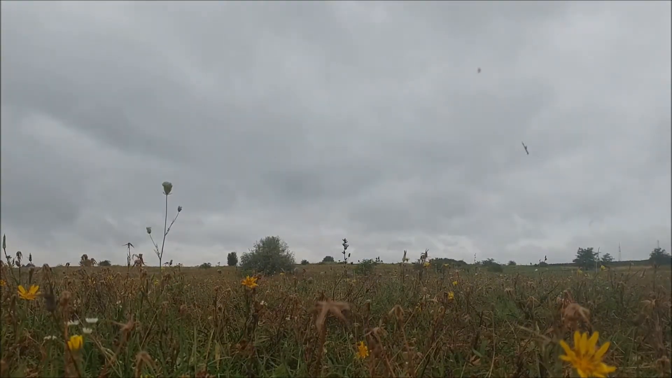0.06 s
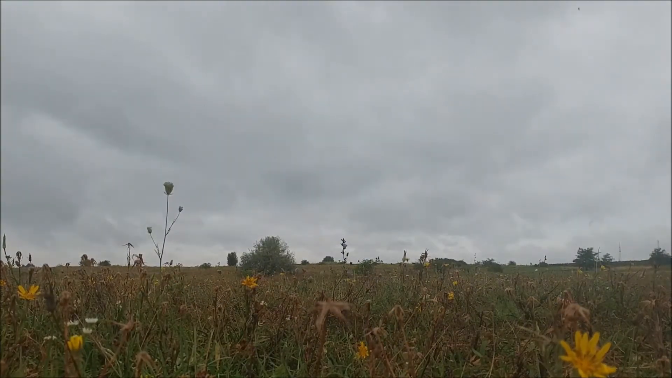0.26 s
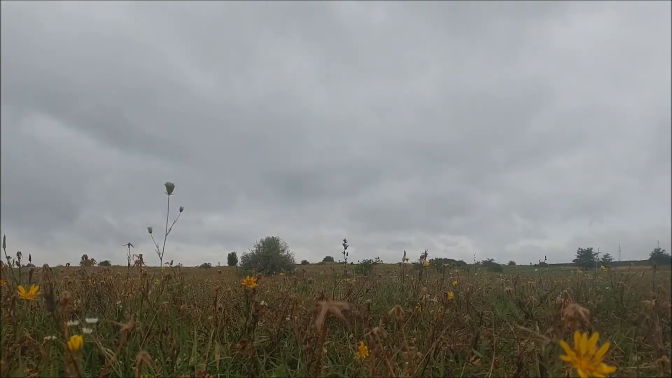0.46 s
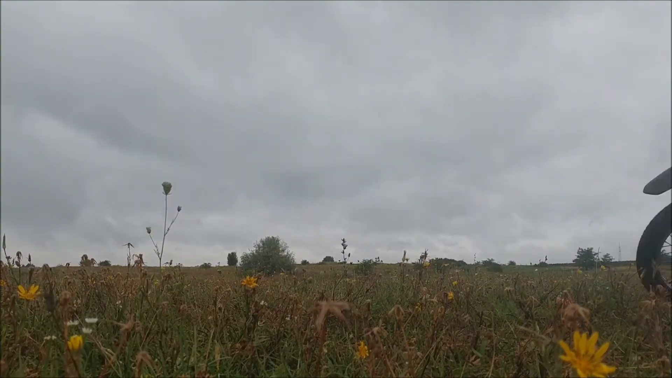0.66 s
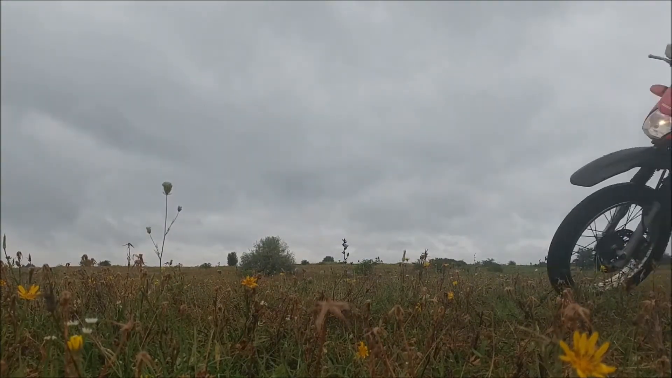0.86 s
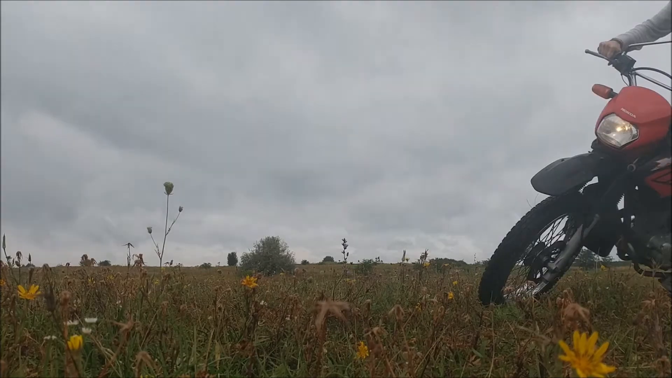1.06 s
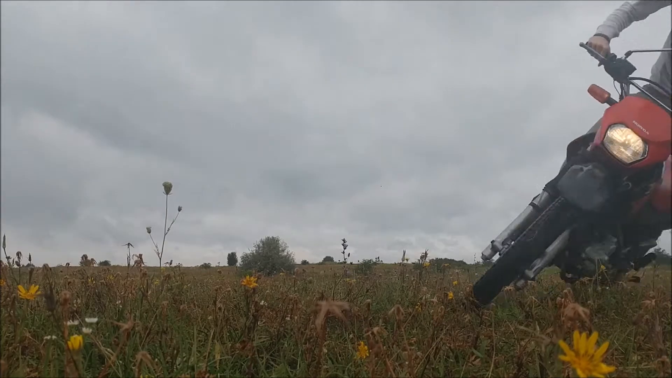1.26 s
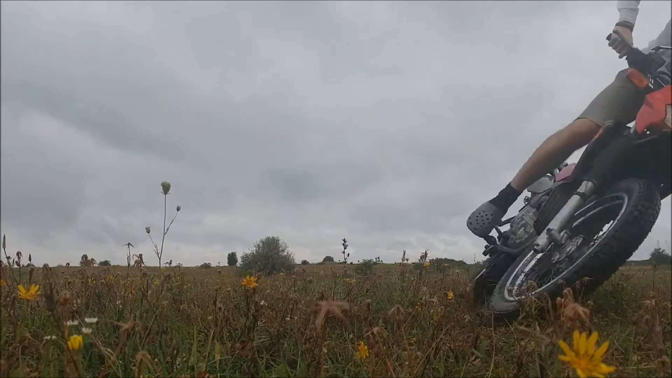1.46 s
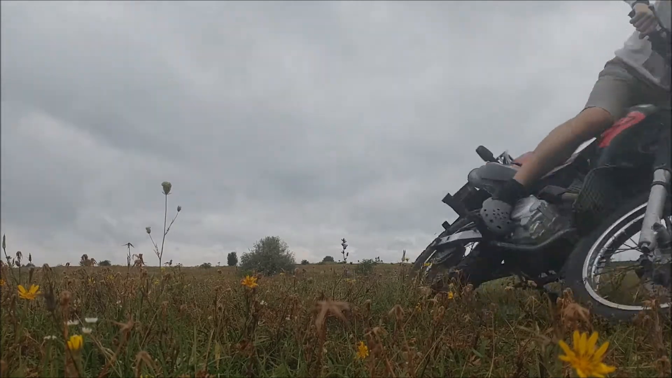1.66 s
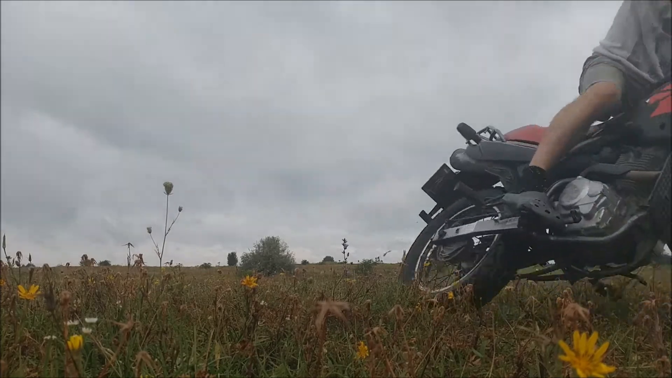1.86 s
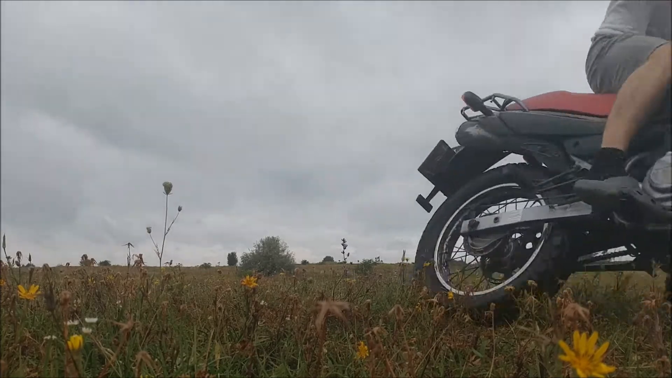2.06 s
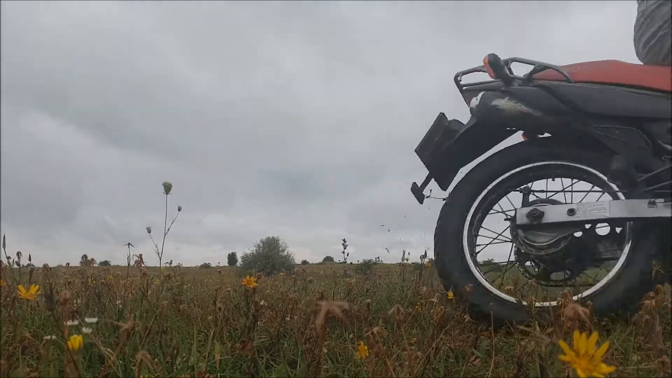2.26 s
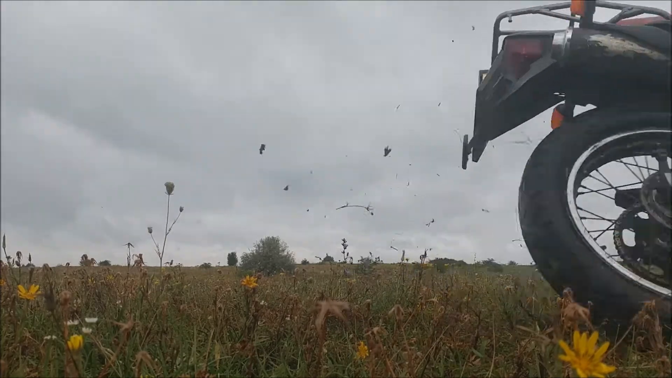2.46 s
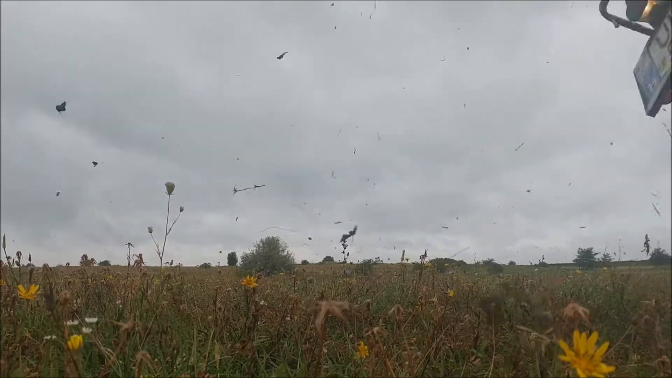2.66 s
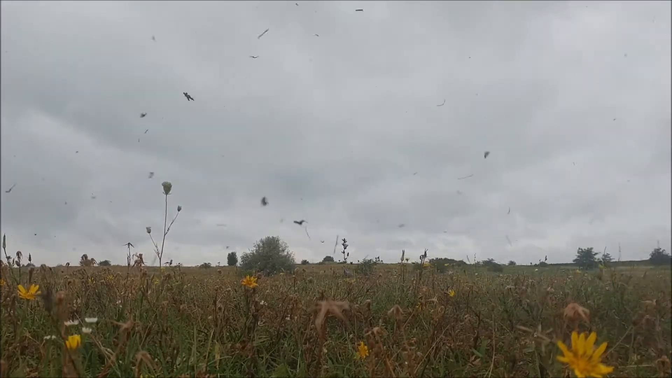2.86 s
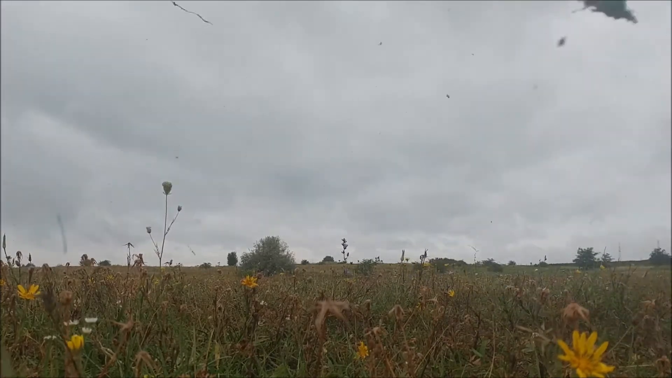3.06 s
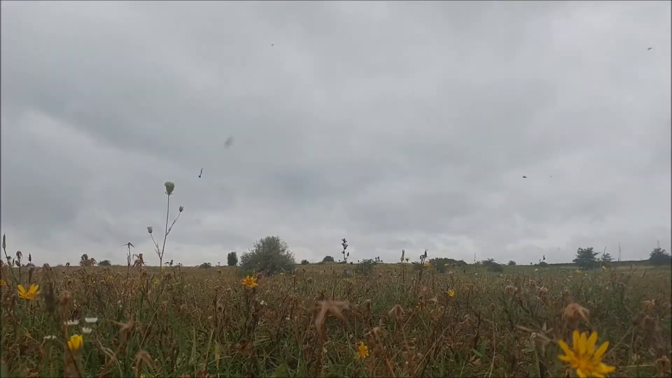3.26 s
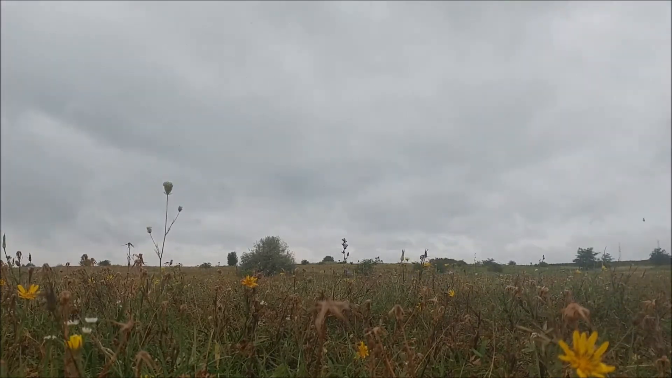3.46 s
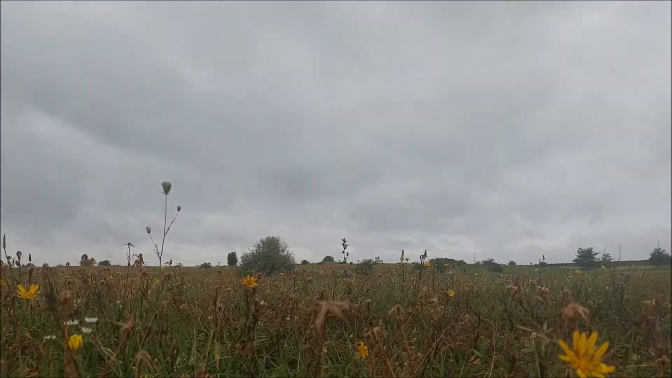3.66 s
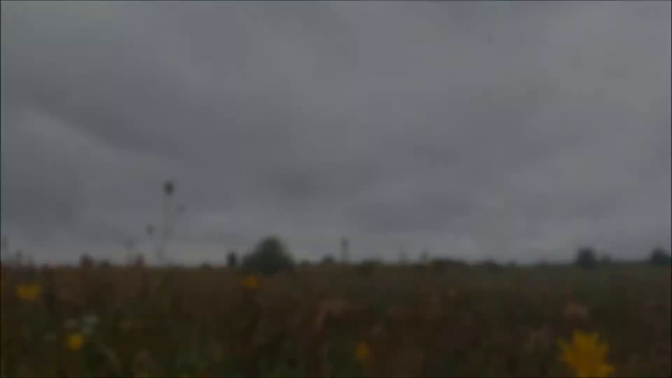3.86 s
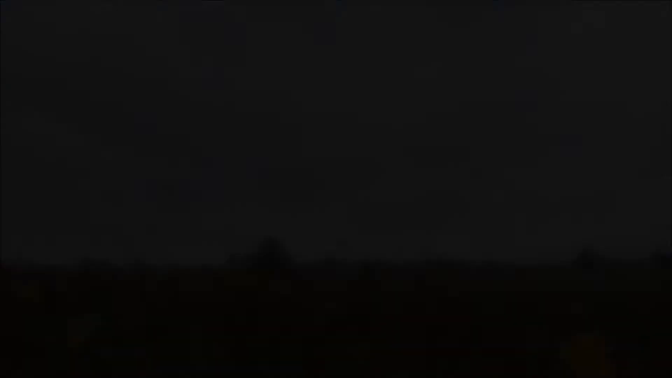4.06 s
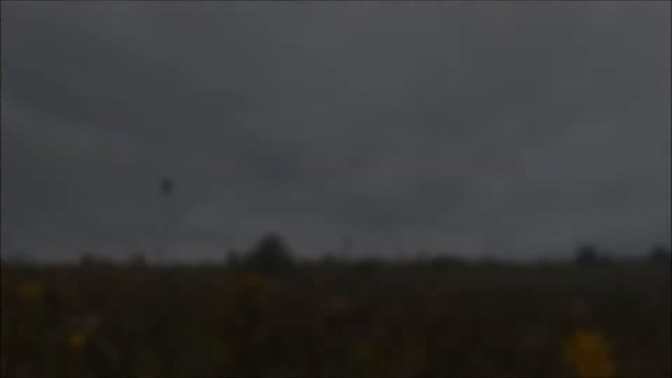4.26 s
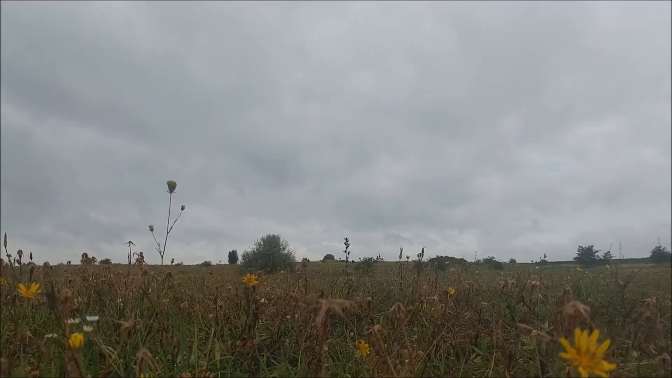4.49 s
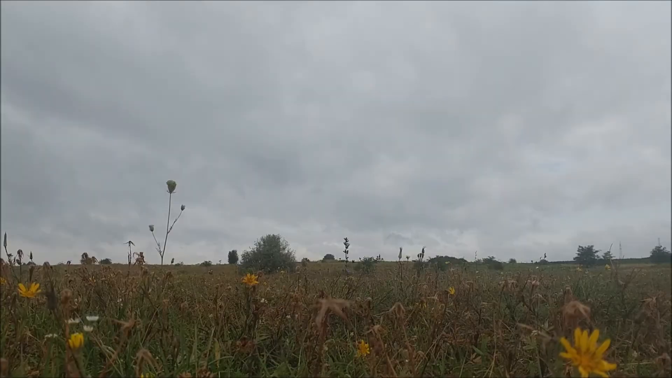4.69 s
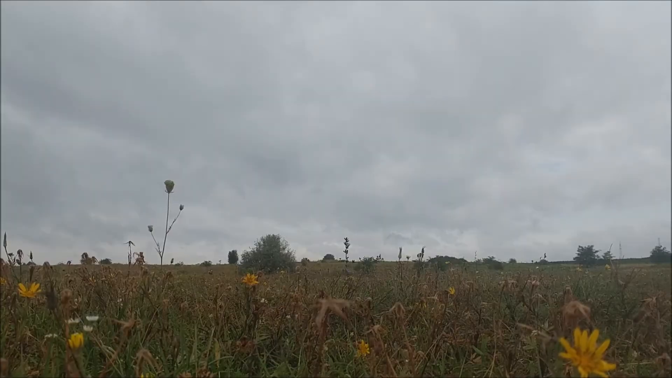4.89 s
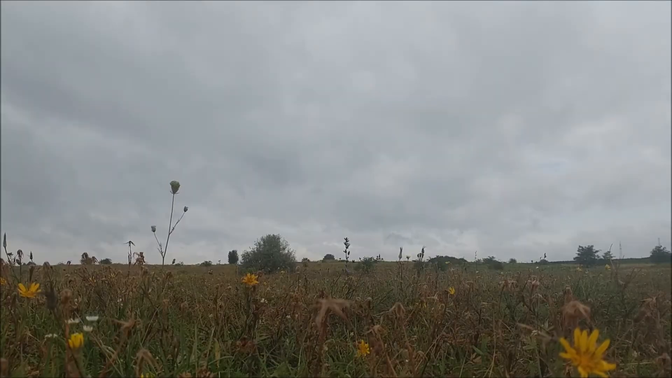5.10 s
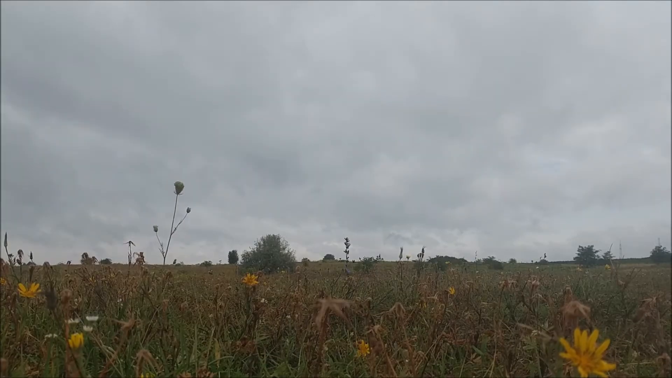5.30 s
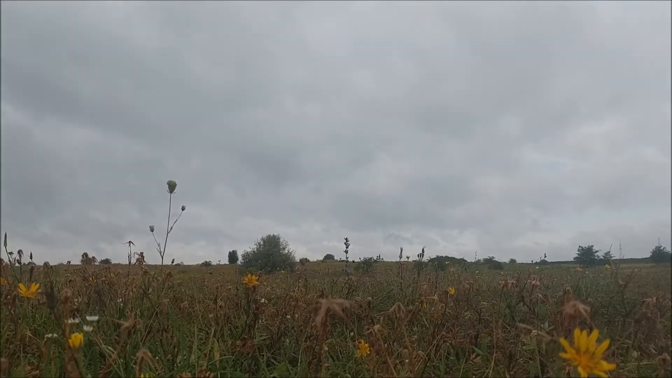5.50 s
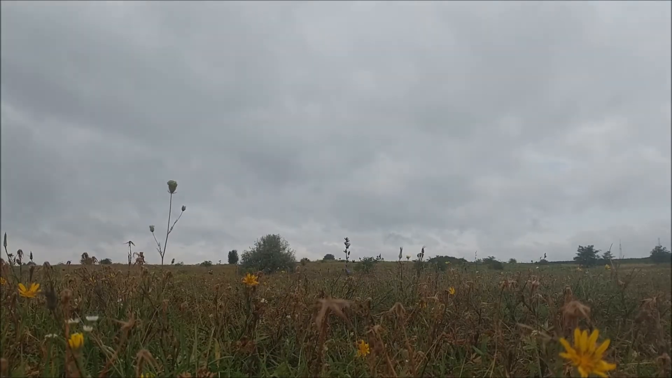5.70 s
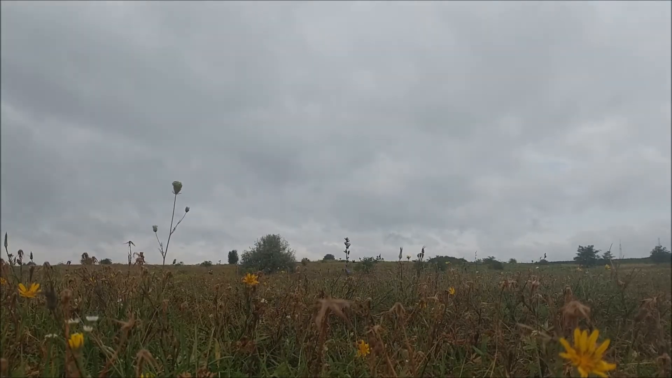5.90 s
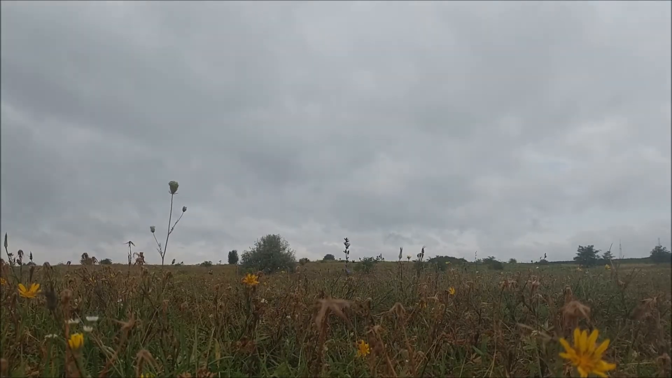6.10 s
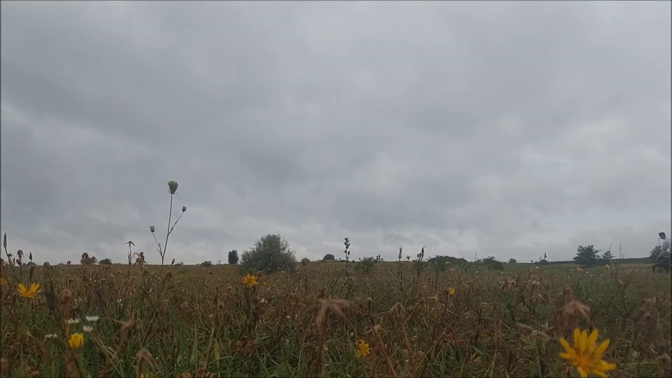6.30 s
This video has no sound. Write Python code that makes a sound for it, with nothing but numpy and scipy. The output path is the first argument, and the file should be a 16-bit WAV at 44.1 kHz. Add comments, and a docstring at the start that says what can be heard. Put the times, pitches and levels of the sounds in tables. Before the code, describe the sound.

Outdoors in an open meadow, a small single-cylinder motorcycle is revved very near a microphone lying in the grass. It honks and growls under throttle, drops to a slower rattling beat with chain and frame knocks, then pulls up again as tyres tear turf. Soil pats down and grass rustles. The engine moves off, slows, and revs again from behind, duller and much quieter over a faint breeze.

```python
"""A single-cylinder four-stroke dirt bike revs, swings round a camera lying in a meadow, sprays soil and rides off.
Near by the airbox honks once a cycle; from behind the tailpipe thumps: pulse trains through resonant ducts.
Throttle, engine speed, distance and facing set the main levels of engine, chain and spray. The chain whines as
gliding tones; frame knocks, soil, stalks and grit are filtered noise bursts and grains over a faint breeze."""
import sys
import numpy as np
from scipy import signal
from scipy.fft import rfft, irfft, next_fast_len
from scipy.io import wavfile
from scipy.ndimage import uniform_filter1d

SR = 44100
rng = np.random.default_rng(int(sys.argv[2]) if len(sys.argv) > 2 else 0)


def digitize_waveform(pressure):
    """Quantize a signal to 16-bit integers and store it at the path in sys.argv[1].

    Rows of a 2-D input are taken as channels; values are limited to [-1, 1].
    """
    field = np.atleast_2d(pressure).T
    bounded = np.clip(field, -1, 1)
    quanta = np.round(bounded * 32767).astype(np.int16)
    wavfile.write(sys.argv[1], SR, quanta)


N = 279581
T = np.arange(N) / SR
HZ = np.maximum(np.fft.rfftfreq(2 * next_fast_len(N), 1 / SR), 1)

# Engine speed. Each row: time in seconds, firings per second.
SPEED = [(0.0, 40.61), (0.25, 33.59), (0.42, 34.2), (0.68, 37.27), (1.12, 49.42), (1.27, 48.49),
         (1.4, 50.25), (1.62, 43.82), (1.95, 29.88), (2.0, 29.0), (2.06, 30.6), (2.14, 33.7), (2.35, 42.2),
         (2.5, 47.3), (2.6, 50.02), (2.98, 50.7), (3.2, 48.4), (3.4, 39.2), (3.56, 32.2), (3.75, 27.76),
         (3.85, 40.2), (4.25, 30.72), (4.52, 28.6), (4.93, 31.35), (5.19, 33.4), (5.4, 42.14),
         (5.68, 38.61), (6.1, 40.85), (6.34, 40.25)]
# Path of the bike. Each row: time in seconds, distance from the camera in metres.
DISTANCE = [(0, 1.18), (0.5, 1.65), (1.1, 1.01), (1.5, 1.45), (1.85, 1.35), (2.15, 1.026), (2.65, 0.89),
            (3.25, 2.08), (3.65, 3.17), (4.25, 5.34), (5.3, 6.7), (5.6, 10), (6.34, 10.6)]
# Side heard. Each row: time in seconds, share of tailpipe against airbox 0-1,
# intake mouth level in dB (high while it faces the camera; mixed 7.5 dB lower).
VIEW = [(0, 0.33, -5), (.2, 0.39, 7.5), (.8, 0.1, -4), (1.2, 0.28, -22.5), (2.0, 0.06, -40),
        (2.5, 0.08, -30.5), (3.2, 0.07, -30), (3.8, 0.81, -12), (6.34, 0.86, -29)]
# Frame resonances. Each row: frequency in Hz, relative level in dB per Hz.
RATTLE = [(18, -40.5), (30, 8.5), (43, -5), (70, -16.5), (98, 2.5), (170, -2.5), (221, -2), (297, -1.5),
          (392, -1.5), (535, -20), (784, -8), (933, -9), (1030, -12.5), (1680, -40.5), (1900, -77.5),
          (2470, -79.5), (4180, -120)]
# Valve gear resonances. Each row: frequency in Hz, relative level in dB per Hz.
CLATTER = [(940, 9.5), (1550, 8.5), (1700, -28), (1920, -3), (2150, 1), (2300, 0), (2520, 1), (2840, -11.5),
           (3070, -1), (3370, -5), (3760, 0.5), (5000, -18.5), (6500, -32.5), (11000, -120)]


def undb(db):
    """Decibels to gain."""
    return 10 ** (np.asarray(db) / 20)


def curves(table):
    """Table columns joined by straight lines in time."""
    s, *columns = np.transpose(table)
    return [np.interp(T, s, c) for c in columns]


def over_hz(table, axis=1):
    """One table column along log frequency."""
    rows = np.array(table)
    return np.interp(np.log(HZ), np.log(rows[:, 0]), rows[:, axis])


def filtered(x, response):
    """Sound through a frequency response."""
    return irfft(rfft(x, 2 * (len(HZ) - 1)) * response)[..., :N]


def body(table):
    """Minimum-phase response with the given spectrum, falling 60 dB per octave past both ends."""
    octaves_above = np.maximum(np.log2(HZ / table[-1][0]), 0)
    octaves_below = np.maximum(np.log2(table[0][0] / HZ), 0)
    level_db = np.maximum(over_hz(table) - 60 * (octaves_above + octaves_below), -120)
    cepstrum = irfft(np.log(undb(level_db)))
    half = len(cepstrum) // 2
    # folding the cepstrum forward makes the response causal
    return np.exp(rfft(np.r_[cepstrum[0], 2 * cepstrum[1:half], np.zeros(half)]))


def below(hz, order=12):
    """Steep low-pass gain."""
    return 1 / (1 + (HZ / hz) ** order)


def unit(x):
    """Scale to rms 1."""
    return x / np.sqrt(np.mean(x ** 2))


def even(x, size=4000):
    """Hold the rms near 1 over a few cycles, leaving the single beats alone; size in samples."""
    power = uniform_filter1d(uniform_filter1d(x ** 2, size), size)
    return x / np.sqrt(power + 1e-12)


def walk(rate_hz):
    """Normal random values, rate_hz of them a second, joined by straight lines."""
    return np.interp(T * rate_hz, np.arange(2000), rng.standard_normal(2000))


def swell(s, half_s):
    """Smooth rise and fall round a moment."""
    return np.exp(-((T - s) / half_s) ** 2)


def grip():
    """Throttle opening 0-1: each twist rises, holds and falls."""
    # Each row: opens at seconds, shuts at seconds, opening 0-1, rise in seconds.
    twists = [(0.139, 1.174, 0.38, 0.083), (1.221, 1.431, 0.4, .03), (1.958, 2.556, 0.36, 0.035),
              (2.594, 3.305, 0.07, 0.057), (4.2, 5.08, 0.72, 0.074), (5.232, 5.395, 0.82, 0.022),
              (5.87, 6.253, 0.36, .036)]
    shut_s = .022
    opening = np.zeros(N)
    for opens, shuts, amount, rise_s in twists:
        opening += amount * (np.tanh((T - opens) / rise_s) - np.tanh((T - shuts) / shut_s)) / 2
    return np.clip(opening, 0, 1)


def loudness(law, throttle, tail):
    """Gain of one sound from throttle, engine speed, distance and facing.

    Law: dB at 1 m coasting at the cruise rate, dB more at full throttle, dB per doubling of speed,
    dB per doubling of distance, dB more from behind."""
    cruise_per_s = 40
    base_db, load_db, speed_db, distance_db, behind_db = law
    speed_octaves = np.log2(curves(SPEED)[0] / cruise_per_s)
    distance_octaves = np.log2(curves(DISTANCE)[0])
    return undb(base_db + load_db * throttle + speed_db * speed_octaves
                + distance_db * distance_octaves + behind_db * tail)


def engine(cycle, throttle, tail):
    """Intake gulps ring the airbox, exhaust slugs the pipe; turbulence and rattle fill the gaps off throttle."""
    # Laws as in loudness().
    boom_law = (-22.5, 10, 0.5, -5.5, -3)
    honk_law = (-18.5, 18.5, 2.5, -3.5, -15.5)
    rasp_law = (-23.5, 10.5, 3, -7.5, -6)
    firm = np.sqrt(throttle)  # a little throttle already steadies the firings
    slack = 1 - firm
    scatter_db = .7 + 1.6 * slack + .4 * tail
    jitter_s = .00002 + .00006 * tail + .00011 * slack
    gulps = firings(cycle - .47, scatter_db, jitter_s)
    front = intake(gulps, cycle, scatter_db, jitter_s)
    rear = tailpipe(cycle, scatter_db, jitter_s, tail)
    beats = np.sqrt(1 - tail) * front + np.sqrt(tail) * rear
    rattle = frame_rattle(cycle, tail)

    low, mid = below(160), below(568, order=20)
    boom = filtered(beats + undb(-3 - 17 * firm) * rattle, low)
    honk = filtered(beats + undb(3 - 21 * firm + 7 * tail) * rattle, mid - low)
    rasp = filtered(beats + undb(3 - 30 * firm + (7 + 19 * firm) * tail) * rattle, 1 - mid)
    boom = tuned_boom(boom, throttle, tail)
    rasp = dulled_rasp(rasp, throttle, tail)
    voice = (boom * loudness(boom_law, throttle, tail)
             + even(honk) * loudness(honk_law, throttle, tail)
             + even(rasp) * loudness(rasp_law, throttle, tail))
    return growl_orders(voice, cycle, throttle, tail) + barks(gulps) + thrum(cycle)


def firings(cycle, scatter_db, jitter_s):
    """One pulse per engine cycle, each a little off in size and moment."""
    at = np.flatnonzero(np.diff(np.floor(cycle)) > 0)
    chance = rng.standard_normal((len(at), 2))
    place = np.clip(at + chance[:, 1] * jitter_s[at] * SR, 0, N - 1).astype(int)
    return np.bincount(place, undb(chance[:, 0] * scatter_db[at]), N)


def puff(cycle, length_cycles, rest):
    """Gas flow: jumps once a cycle and dies away to a steady rest."""
    return rest + np.exp(-(cycle % 1) / length_cycles)


def intake(gulps, cycle, scatter_db, jitter_s):
    """Gulps bounce in the duct and ring the airbox; valve opening and closing waves leave through the mouth."""
    # Airbox. Each row: frequency in Hz, relative level in dB per Hz.
    airbox_colour = [(25, -51.5), (48, -5), (70, 9.5), (100, 4.5), (135, -7.5), (190, -0.5), (240, 0),
                     (300, 11.5), (360, 11), (430, -5), (500, -13), (580, -26), (800, -21), (1100, -35),
                     (1700, -58.5)]
    # Intake mouth. Each row: frequency in Hz, relative level in dB per Hz.
    mouth_colour = [(330, -7), (420, -1), (470, 7.5), (520, 4.5), (590, -28.5)]
    airbox = even(filtered(duct(gulps, round_trip_s=.002695, reflection=.65), body(airbox_colour)))
    closings = firings(cycle - .97, scatter_db, jitter_s)  # half a cycle after opening
    mouth = even(filtered(gulps + .34 * closings, body(mouth_colour)))
    return airbox + undb(curves(VIEW)[1] - 7.5) * mouth


def duct(x, round_trip_s, reflection):
    """A wave bounces to and fro in a duct, which spreads each pulse into a short train."""
    lag = np.exp(-2j * np.pi * HZ * round_trip_s)
    return filtered(x, (lag - reflection) / (1 - reflection * lag))


def tailpipe(cycle, scatter_db, jitter_s, tail):
    """Exhaust slugs, with weaker ones between the firings from behind, pass the silencer and ring the pipe."""
    # Tailpipe. Each row: frequency in Hz, relative level in dB per Hz.
    pipe_colour = [(25, -26.5), (58, -14), (90, -21.5), (130, 4), (220, -4.5), (290, 10), (390, -1.5),
                   (480, -2.5), (570, -24), (700, -11), (980, -34), (1250, -43), (1700, -49.5)]
    after_cycles, after_db = .52, -9.5
    slugs = firings(cycle, scatter_db, jitter_s)
    after_slugs = firings(cycle - after_cycles, scatter_db, jitter_s)
    slugs = slugs + undb(after_db) * tail * after_slugs
    return even(filtered(silencer(slugs), body(pipe_colour)))


def silencer(x):
    """Chambers hold the higher pitches back, which rounds each thump into a short rising chirp."""
    # Each row: frequency in Hz, group delay in seconds.
    pipe_delay = [(100, .0015), (230, .0012), (330, .004), (450, .009), (600, .0105), (1100, .0095)]
    phase_turns = np.cumsum(over_hz(pipe_delay) * np.gradient(HZ))
    return filtered(x, np.exp(-2j * np.pi * phase_turns))


def frame_rattle(cycle, tail):
    """Turbulent noise pulsing with the gas flow rings the frame; the ground shakes it harder or softer."""
    # Each row: time in seconds, rattle level in dB.
    shake = [(0, 0), (.25, -3), (1.1, -1), (1.25, 7), (1.45, 7), (1.6, 1.5), (1.9, 1), (2.1, -4), (2.5, -5),
             (2.85, -1.5), (3.3, -7), (3.55, -11), (4.1, -11), (4.3, -1), (5.1, -1), (6.34, 0)]
    flow = puff(cycle - .15 * tail, .3, .65 - .1 * tail) * undb(2 * walk(60))
    return even(filtered(flow * rng.standard_normal(N), body(RATTLE))) * undb(curves(shake)[0])


def tuned_boom(boom, throttle, tail):
    """Boom that sinks or swells for a moment, and gains when the loaded intake tunes in with the firings."""
    # Each row: centre in seconds, half length in seconds, boom change in dB.
    boom_swells = [(0.164, 0.055, -9.5), (1.32, 0.1, -9.5), (3.085, 0.27, 2.5), (3.677, 0.13, -1),
                   (4.17, 0.087, -3)]
    tuned_per_s, half_width_per_s = 43, 3.8
    boom = even(boom) * undb(sum(db * swell(s, half_s) for s, half_s, db in boom_swells))
    closeness = np.exp(-((curves(SPEED)[0] - tuned_per_s) / half_width_per_s) ** 2)
    in_tune = undb(7.8 * throttle * (1.5 - tail) * closeness)
    return boom + (in_tune - 1) * filtered(boom, below(150) - below(69))


def dulled_rasp(rasp, throttle, tail):
    """Grass soaks up the upper rasp with distance, less under throttle; from behind its top is lost too."""
    dull_from_m, dull_hz, behind_hz = 2.83, 970, 1420
    octaves_beyond = np.log2(curves(DISTANCE)[0] / dull_from_m)
    dull = np.clip(octaves_beyond, 0, 1) * (1 - .45 * throttle)
    rasp = (1 - dull) * rasp + dull * filtered(rasp, below(dull_hz, order=8))
    return (1 - tail) * rasp + tail * filtered(rasp, below(behind_hz, order=16))


def harmonic(x, cycle, multiple):
    """The part of a sound that sits on one multiple of the firing rate."""
    turn = np.exp(2j * np.pi * multiple * cycle)
    return 2 * np.real(uniform_filter1d(uniform_filter1d(x / turn, size=1300), size=1300) * turn)


def growl_orders(x, cycle, throttle, tail):
    """Under load single multiples of the firing rate stand out or sink, depending on the side that is heard."""
    # Each row: multiple of the firing rate, dB weighted by facing 0-1, dB weighted by 2 - facing.
    order_lift = [(2, 7.5, 1), (6, 13, -4), (7, 5, 1), (8, -9, -1.5), (9, -3, 2.5), (10, 8.5, 0),
                  (11, -7.5, 3), (12, 13, -9.5)]
    facing = np.clip(1 + (curves(VIEW)[1] + 6) / 10, 0, 1)
    load = np.clip(throttle / .5, 0, 1) * (tail < .6)
    out = x
    for multiple, front_db, side_db in order_lift:
        lift = undb(load * (facing * front_db + (2 - facing) * side_db))
        out = out + (lift - 1) * harmonic(x, cycle, multiple)
    return out


def barks(gulps):
    """The intake barks in short swells of the gulps through its own resonances."""
    # Each row: centre in seconds, half length in seconds, level in dB.
    bark_swells = [(0.88, 0.14, -21.5), (2.137, 0.16, -16.5)]
    # Each row: frequency in Hz, relative level in dB per Hz.
    bark_colour = [(100, -14.5), (135, -1), (180, -1), (230, 6), (290, 3), (400, -10.5)]
    gain = sum(undb(db) * swell(s, half_s) for s, half_s, db in bark_swells)
    return even(filtered(gulps, body(bark_colour))) * gain


def thrum(cycle):
    """Soft, even firings: ten low lines follow the engine speed through the pipe's resonances."""
    # Each row: time in seconds, level in dB.
    thrum_level = [(2.45, -40), (2.62, -20.5), (3.2, -22.5), (3.5, -33), (3.75, -58), (3.86, -36.5),
                   (4.05, -43), (4.25, -55.5)]
    # Strength of a line at its pitch. Each row: frequency in Hz, level in dB.
    thrum_colour = [(32, -19), (50, 0.5), (75, 7), (100, 1.5), (135, -5), (200, -13.5), (250, -16.5),
                    (300, -10), (350, -0.5), (400, -21), (455, -6), (520, -22.5)]
    waver_rad = .15
    speed = curves(SPEED)[0]
    hz, db = np.transpose(thrum_colour)
    lines = np.zeros(N)
    for k in range(1, 11):
        gain = undb(np.interp(k * speed, hz, db) + 2 * walk(17))
        lines += gain * np.sin(2 * np.pi * k * (cycle - .15) + waver_rad * walk(17))
    active = (T > thrum_level[0][0]) * (T < thrum_level[-1][0])
    return lines * undb(curves(thrum_level)[0]) * active


def chain(cycle, throttle, tail):
    """Links mesh with the sprocket nearly eight times per firing; the slack makes the tones waver and break up."""
    # Law as in loudness().
    chain_law = (-28, 7.5, -2, -6.5, -7.5)
    # Chain pulls tight and sings. Each row: centre in seconds, half length in seconds,
    # mesh tone level in dB, octave level in dB.
    surges = [(0.606, 0.13, -30.5, -46), (0.952, 0.037, -8.5, -27), (1.12, 0.024, -25.5, -16),
              (1.137, 0.1, -10.5, -22), (1.278, 0.13, -25.5, -38.5), (1.399, 0.017, -15, -12.5),
              (1.49, 0.1, -49, -23.5), (1.767, 0.06, -27, -45.5), (1.872, 0.02, -34, -29),
              (2.634, 0.18, -20.5, -18), (3.079, 0.17, -13.5, -23), (3.323, 0.096, -19, -57),
              (3.492, 0.08, -44, -32), (5.99, 0.13, -32.5, -43.5), (6.175, 0.08, -34.5, -43)]
    links_per_firing = 7.87
    steady = loudness(chain_law, throttle, tail)
    mesh_surge = sum(undb(db) * swell(s, half_s) for s, half_s, db, _ in surges)
    octave_surge = sum(undb(db) * swell(s, half_s) for s, half_s, _, db in surges)
    mesh_gain = np.hypot(steady, mesh_surge)
    octave_gain = np.hypot(steady * undb(-8), octave_surge)

    turn = 2 * np.pi * (links_per_firing * cycle + .085 * walk(36))
    mesh = undb((4 - 2 * throttle) * walk(50)) * np.sin(turn)
    flutter = undb(3 * (1 - tail) * walk(45) - 1)
    octave = np.sin(2 * turn + (.65 - .35 * tail) * walk(60)) * flutter
    # the chain guard rings when a mesh overtone sweeps through it
    guard_hz, half_width_hz, guard_db = 995, 78, 5
    mesh_hz = links_per_firing * curves(SPEED)[0]
    upper = np.zeros(N)
    for k, db in [(3, -13), (4, -30)]:
        ring = undb(guard_db) * np.exp(-((k * mesh_hz - guard_hz) / half_width_hz) ** 2) * (1 - tail)
        upper += (undb(db) + ring) * np.sin(k * turn + .7 * walk(100))
    # sprocket out of true: one wobble per three mesh periods adds side tones
    wobble = 1 + .52 * (1 - tail) * np.cos(turn / 3 + .98 * walk(45))
    return mesh_gain * mesh + octave_gain * (octave + upper) * wobble


def metal():
    """Response of the ringing engine castings."""
    # Fins and covers. Each row: frequency in Hz, width in Hz, peak in dB over the plain noise.
    fins = [(2284, 40, 7.5), (2760, 70, 10), (3350, 88, 5), (4280, 22, 8.5), (5120, 91, 5.5),
            (6130, 180, 3), (6970, 200, -1), (7940, 120, 5.5)]
    return 1 + sum((undb(db) - 1) / (1 + 2j * (HZ - hz) / width_hz) for hz, width_hz, db in fins)


def jolts():
    """Chain and frame knock over bumps: short rough bursts in the bike's own resonances, with a faint clink."""
    # Each row: start in seconds, level in dB, decay in seconds.
    bumps = [(0.022, -11, 0.009), (0.102, -9, 0.009), (0.707, -11, 0.015), (0.942, -13.5, 0.044),
             (1.387, -14, 0.035), (1.521, -14.5, 0.011), (1.6, -8.5, 0.012), (1.683, -9.5, 0.02),
             (1.779, -13.5, 0.027), (1.847, -19.5, 0.075), (1.985, -13, 0.02), (2.567, -27, 0.011),
             (2.752, -13.5, 0.039), (2.852, -13, 0.13), (2.921, -29, 0.014), (3.256, -22.5, 0.015)]
    attack_s, clink_db = .00051, -40.5
    push = np.zeros(N)
    for s, db, decay_s in bumps:
        age = np.maximum(T - s, 0)
        push += undb(db) * (1 - np.exp(-age / attack_s)) * np.exp(-age / decay_s)
    knock = even(filtered(rng.standard_normal(N), body(RATTLE)), size=400)
    clink = unit(filtered(rng.standard_normal(N), body(CLATTER) * metal()))
    return push * (knock + undb(clink_db) * clink)


def frame_rings():
    """Short, hollow notes from the frame as the chain snatches."""
    # Each row: centre in seconds, half length in seconds, pitch in Hz, level in dB.
    notes = [(0.035, 0.043, 309.5, -23), (1.332, 0.004, 328, -6), (1.349, 0.01, 330, -20.5),
             (1.41, .015, 340.5, -12.5), (1.54, 0.0097, 354, -15.5), (1.614, 0.0097, 341, -11.5),
             (1.703, 0.012, 320.5, -9.5), (1.781, 0.023, 292, -13.5), (3.616, .014, 369, -22.5)]
    out = np.zeros(N)
    for s, half_s, hz, db in notes:
        out += undb(db) * swell(s, half_s) * np.sin(2 * np.pi * hz * (T - s) + .3 * walk(82))
    return out


def top_end(cycle, throttle, tail):
    """Valve gear clatters all the time; gas hiss pulses once a cycle, most sharply under load from behind."""
    # Laws as in loudness().
    clatter_law = (-31.5, 1.5, 7.5, -11.5, -7)
    hiss_law = (-40.5, 10.5, 12.5, -10.5, -4.5)
    # Gas hiss. Each row: frequency in Hz, relative level in dB per Hz.
    hiss_colour = [(2650, -40.5), (4500, -0.5), (6960, 2.5), (8130, -5.5), (9160, -26.5), (10400, -11.5),
                   (13300, -16), (15600, -22)]
    noise = rng.standard_normal((2, 2, N))
    taps = puff(cycle + .07, .25, 1) * undb(1.5 * walk(250))
    clatter = filtered(noise[0] * taps, body(CLATTER) * metal())
    spit = puff(cycle + .05, .17, .1 + .6 * (1 - tail) + .6 * (1 - throttle))
    hiss = filtered(noise[1] * spit * undb(1.2 * walk(200)), body(hiss_colour) * metal())
    # from behind only the top of the hiss carries
    hiss = hiss - tail * filtered(hiss, below(4400, order=40))
    return (even(clatter) * loudness(clatter_law, throttle, tail)
            + even(hiss) * loudness(hiss_law, throttle, tail))


def pipe_spit(cycle, throttle, tail):
    """A thin, high tick of gas with every firing, heard from behind."""
    # Pipe edge. Each row: frequency in Hz, relative level in dB per Hz.
    spit_colour = [(4800, -17), (5200, 4.5), (5600, 0.5), (6200, 0), (6700, -13), (7500, -6.5),
                   (8500, -19.5)]
    jets = rng.standard_normal((2, N)) * puff(cycle + .04, .13, .08)
    return unit(filtered(jets, body(spit_colour))) * undb(-65) * throttle * tail ** 2


def spray(throttle, tail):
    """Knobbly tyres tear grass and fling soil: a dense crackle of tiny grains, and one burst of wheelspin."""
    # Law as in loudness().
    spray_law = (-41, 1.5, -1.5, -11.5, -3)
    # Torn turf. Each row: frequency in Hz, relative level in dB per Hz.
    spin_colour = [(1900, -6), (2300, -15), (2550, -5), (2850, 19), (3100, -3), (3450, 9.5), (4200, -2.5),
                   (8000, -30)]
    grains_per_s = 1600
    spin_s, spin_half_s, spin_db = 2.645, .3, -33.5
    sizes = undb(3.5 * np.minimum(rng.exponential(size=N), 3.5)) * (rng.random(N) < grains_per_s / SR)
    grains = sizes * rng.standard_normal((2, N))
    colour = [(2150, -4.0), (2800, -6.5), (4200, -6.0), (7500, -9.5), (9300, -19.0), (15000, -23.5)]
    flung = unit(filtered(grains, body(colour) * metal())) * loudness(spray_law, throttle, tail)
    tearing = unit(filtered(grains * undb(4 * walk(46)), body(spin_colour)))
    return flung + tearing * undb(spin_db) * swell(spin_s, spin_half_s)


def clods():
    """Soil lands near the camera with a dull pat: decaying noise bursts."""
    # Each row: start in seconds, level in dB, decay in seconds.
    landings = [(2.574, -12, .004), (2.673, -11, .004), (2.77, -17, .005), (2.871, -16, .004),
                (3.274, -17, .004), (3.358, -26, .006), (3.795, -36, .003)]
    push = np.zeros(N)
    for s, db, decay_s in landings:
        age = np.maximum(T - s, 0)
        push += undb(db) * (age > 0) * np.exp(-age / decay_s)
    colour = body([(450, 14), (800, 15), (1300, 1.5), (1700, -7.5), (2200, -28.5), (3500, -21), (7000, -38)])
    return filtered(push * rng.standard_normal(N), colour / np.sqrt(np.mean(np.abs(colour) ** 2)))


def patter(per_s, spread_db):
    """Tiny impacts at random moments, a few much stronger than the rest."""
    sizes = undb(spread_db * np.minimum(rng.exponential(size=N), 3))
    return sizes * (rng.random(N) < per_s / SR) * rng.choice([-1, 1], N)


def turf():
    """Turf crunches under the knobs and soil rustles down through the grass."""
    # Each row: time in seconds, crunch level in dB, rustle level in dB.
    turf_levels = [(.3, -67, -83), (.5, -39.5, -81), (.73, -44, -83), (.9, -62.5, -90), (1.28, -57, -69),
                   (1.37, -34, -64), (1.46, -49, -82), (2.4, -59, -63), (2.65, -33, -43.5),
                   (3.05, -63, -51), (3.37, -48.5, -50.5), (3.6, -57, -66), (4, -66.5, -73),
                   (4.3, -81.5, -89)]
    # Each row: frequency in Hz, relative level in dB per Hz.
    crunch_colour = [(1150, -1.5), (1350, 1), (1500, -6), (1650, -15)]
    # Each row: frequency in Hz, relative level in dB per Hz.
    rustle_colour = [(1500, -3.5), (1900, 0), (2500, -3), (3500, -7.5)]
    crunch_db, rustle_db = curves(turf_levels)
    crunch = unit(filtered(patter(1000, 3), body(crunch_colour)))
    rustle = unit(filtered(patter(700, 4), body(rustle_colour)))
    return crunch * undb(crunch_db) + rustle * undb(rustle_db)


def swish():
    """Stalks brush past the tyres in a fluttering, high hiss."""
    # Each row: time in seconds, level in dB.
    swish_level = [(0, -44.5), (.8, -44.5), (1.4, -45.5), (1.7, -74), (2.5, -42), (3.2, -43.5), (3.7, -61),
                   (4.2, -70.5), (4.6, -78)]
    # Each row: frequency in Hz, relative level in dB per Hz.
    swish_colour = [(3000, -20), (3450, 3.5), (3900, -25), (5800, -46), (6600, 0.5), (7800, -5.5),
                    (8700, -16.5)]
    brush = rng.standard_normal((2, N)) * undb(2 * walk(70))
    return unit(filtered(brush, body(swish_colour) * metal())) * undb(curves(swish_level)[0])


def snaps():
    """Dry stalks snap under the tyres: random impacts ring in five narrow bands."""
    # Each row: time in seconds, level in dB.
    snap_level = [(0, -67.5), (.4, -52), (.8, -49.5), (1.15, -46), (1.6, -69), (2.1, -50.5), (2.5, -42),
                  (2.9, -56.5), (3.4, -68), (4.1, -95)]
    # Each row: ring frequency in Hz, relative level in dB.
    snap_rings = [(2900, -4), (3500, 0), (4400, -1), (5700, -1.5), (6900, 1)]
    per_s, width_hz = 45, 230
    rings = np.zeros(N)
    for hz, db in snap_rings:
        rings += undb(db) * filtered(patter(per_s, 3), 1 / (1 + 1j * (HZ - hz) / width_hz) ** 3)
    return unit(rings) * undb(curves(snap_level)[0])


def ticks():
    """Single bits of grit or stalk strike near by: a sharp crack and a short ring of the camera case."""
    # Each row: start in seconds, peak in dB before panning, ring in Hz.
    strikes = [(0.232, -3, 6420), (0.375, -30, 3300), (0.404, -27, 6360), (0.577, -31, 3370),
               (1.098, -18, 5770), (1.3213, -13.5, 6160), (1.448, -24, 6100), (2.055, -23, 3820),
               (2.0842, -26, 4150), (2.509, -17, 6460), (4.2278, -36.5, 5400), (5.8686, -48, 5940)]
    length = 4000
    out = np.zeros((2, N + length))
    age = np.arange(length) / SR
    for s, db, hz in strikes:
        burst = rng.standard_normal((2, length)) * (np.exp(-age / .0018) + .12 * np.exp(-age / .006))
        band = signal.butter(3, [hz * .99, hz * 1.24], "band", fs=SR, output="sos")
        tick = signal.sosfilt(band, burst) + .05 * burst
        start = int(s * SR)
        out[:, start:start + length] += undb(db) * tick / np.abs(tick).max()
    return out[:, :N]


def shimmer(x):
    """The treble flickers: every few hundred hertz has its own slowly changing level."""
    spread_db = 3.2
    bands = signal.stft(x, nperseg=512)[2]
    chance = rng.standard_normal(bands.shape)
    chance = uniform_filter1d(chance, size=3, axis=1)
    chance = unit(uniform_filter1d(chance, size=14, axis=2))
    return signal.istft(bands * undb(spread_db * chance - 3))[1][:, :N]


def field(sides):
    """Faint breeze: coloured noise, alike in both ears at the bottom and wider towards the treble."""
    # Each row: frequency in Hz, relative level in dB per Hz.
    field_colour = [(18, -54.5), (30, -15), (75, 6), (277, -13.5), (351, 4.5), (547, -43.5), (831, -11.5),
                    (1020, -22.5), (1520, -50.5), (4670, -54), (5190, -48), (12600, -56), (15600, -68.5)]
    side = filtered(rng.standard_normal(N), 1 - below(1500, order=2))
    breeze = rng.standard_normal(N) + sides * side
    return unit(filtered(breeze, body(field_colour))) * undb(-38.5)


def ports(bike, sides):
    """The camera case colours its two ports differently, in level and phase."""
    # Each row: frequency in Hz, left minus right in dB, left lead in radians.
    port_balance = [(100, -0.3, -0.06), (300, 0.7, -0.18), (420, 2.5, -.08), (500, 13, .5),
                    (560, -2.5, 2.6), (610, -12, 0), (720, -5, -0.75), (930, -.5, -0.3), (1127, 0, -0.65),
                    (1320, 17.5, 0), (1450, 13, .3), (1700, -1.5, 2.4)]
    ratio = undb(over_hz(port_balance)) * np.exp(1j * over_hz(port_balance, axis=2))
    return bike + sides * filtered(bike, (ratio - 1) / (ratio + 1))


def panned(treble, sides):
    """Treble balance between left and right, by frequency."""
    # Each row: frequency in Hz, left minus right in dB.
    treble_pan = [(2000, 4), (2300, -2.5), (3500, 1), (4100, -7), (5000, 1), (6000, 6.5), (8500, 9.5),
                  (10000, 4.5), (15000, 10)]
    pan = undb(sides * over_hz(treble_pan) / 2)
    return filtered(treble, pan / np.sqrt(np.mean(pan ** 2, axis=0)))


def scene():
    """The bike through the two ports of the camera, over a faint breeze in the field."""
    cycle = np.cumsum(curves(SPEED)[0]) / SR + .57
    throttle = grip()
    tail = np.clip(curves(VIEW)[0], 0, 1)
    sides = np.array([[1], [-1]])
    bike = engine(cycle, throttle, tail) + chain(cycle, throttle, tail)
    bike = bike + jolts() + frame_rings() + clods() + turf()
    wash = shimmer(top_end(cycle, throttle, tail) + spray(throttle, tail) + swish())
    treble = wash + pipe_spit(cycle, throttle, tail) + snaps() + ticks()
    return ports(bike, sides) + panned(treble, sides) + field(sides)


def record(dry):
    """The camera drops the deepest bass, rounds the highest peaks and cuts the top."""
    top_hz = 15700
    dry = filtered(dry, 1 - below(39, order=9))
    rounded = dry / (1 + np.abs(dry / .95) ** 6) ** (1 / 6)
    return signal.sosfilt(signal.ellip(10, .2, 80, top_hz, fs=SR, output="sos"), rounded)


dry = scene()
out = record(dry)
digitize_waveform(out)
```